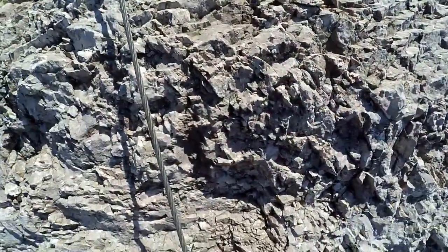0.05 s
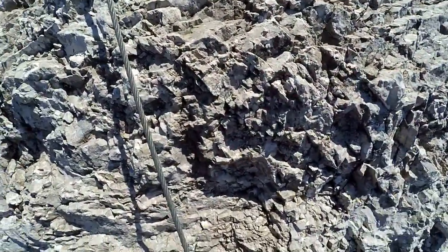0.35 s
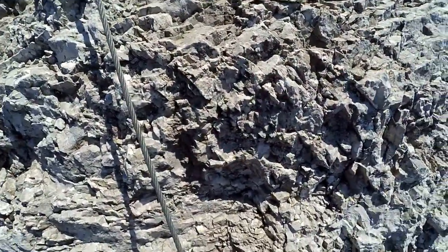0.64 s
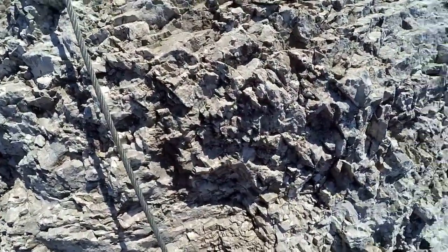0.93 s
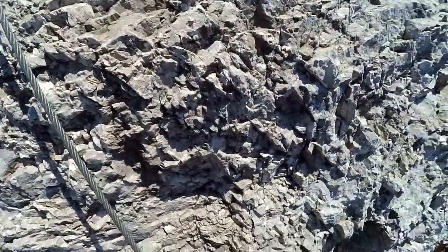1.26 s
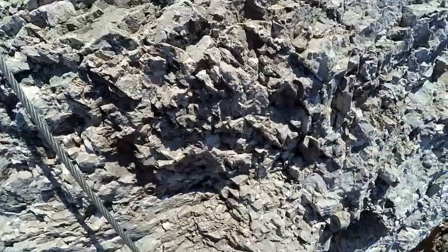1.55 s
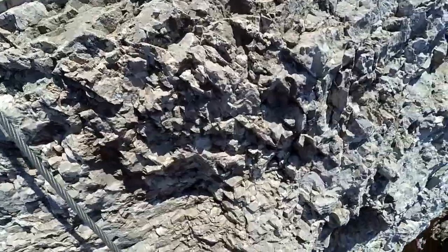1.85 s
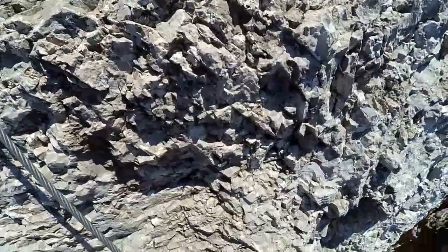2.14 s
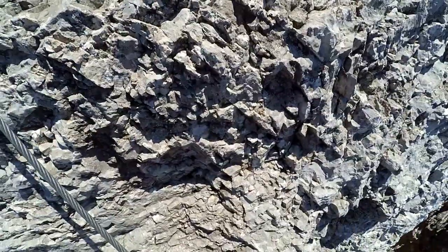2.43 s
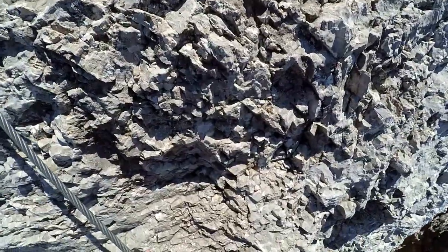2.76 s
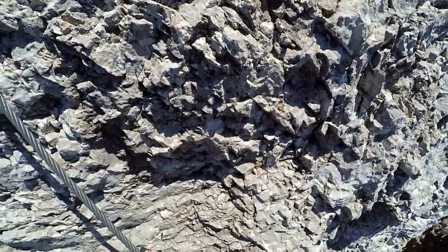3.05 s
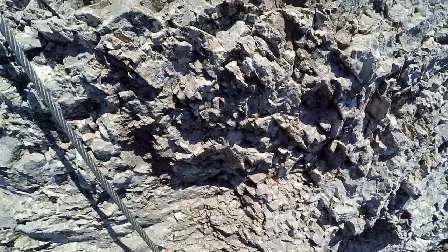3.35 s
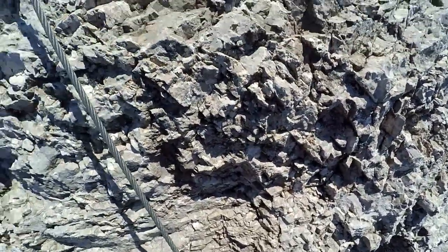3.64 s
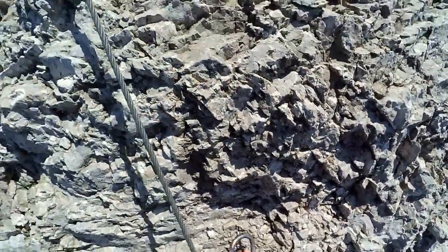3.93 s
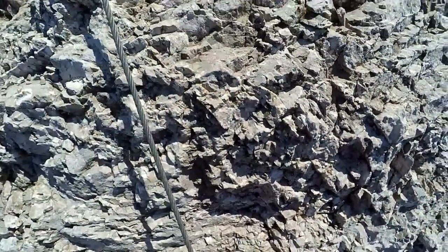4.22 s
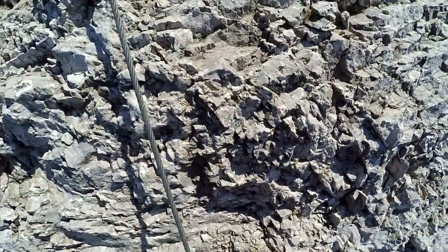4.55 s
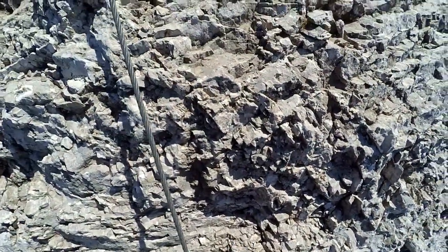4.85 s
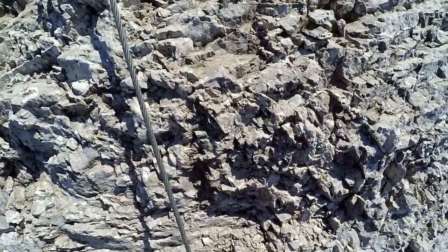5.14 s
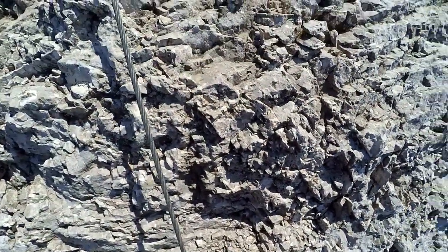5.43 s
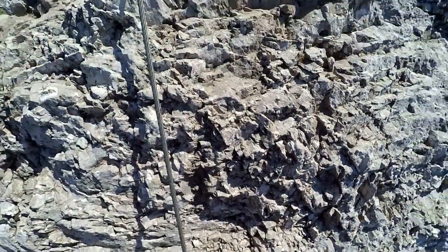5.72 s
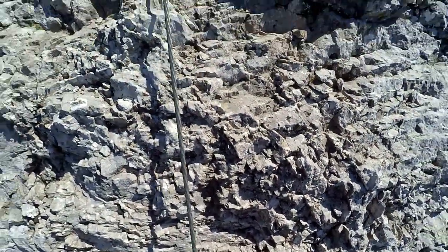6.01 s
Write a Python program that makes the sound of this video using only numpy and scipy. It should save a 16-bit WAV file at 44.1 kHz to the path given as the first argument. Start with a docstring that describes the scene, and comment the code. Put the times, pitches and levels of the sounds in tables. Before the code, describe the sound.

Wind buffets a body-worn microphone in uneven low thumps for the first two seconds, then falls to a faint rumble over quiet mountain air. Throughout, a climber's gear and boots make close, dry, irregular ticks on rock, with faint clothing rustle. At about 1.3 seconds a carabiner knocks sharply on a steel cable and rings briefly. A cluster of clicks follows, with lighter metal knocks around 1.6 and 2.3 seconds. Soles scrape briefly on grit, snapping small stones, most clearly between 3.2 and 3.6 seconds. After a small clack at 4 seconds, the loudest carabiner knock lands at about 4.4 seconds, with a thin high ring and a soft low bump. Two more knocks come near 5 and 5.5 seconds among further taps. A nylon sleeve swishes softly around 5.8 seconds, and a last light scuff and ticks follow just after 6 seconds.

```python
"""Carabiners knock as a climber moves up a rock face along a steel cable, heard from a body-worn camera.
Each impact is a broadband crack followed by the free vibration of quickly damped metal modes.
Small gear and boots tick on the rock; friction makes soles scrape on grit and a sleeve swish.
Turbulent wind buffets the microphone for the first two seconds, then drops to a low rumble.
One low bump on the camera comes with the loudest knock."""
import sys
import numpy as np
from scipy import signal
from scipy.fft import rfft, irfft, next_fast_len
from scipy.io import wavfile
from scipy.ndimage import uniform_filter1d

SR = 44100
rng = np.random.default_rng(int(sys.argv[2]) if len(sys.argv) > 2 else 0)


def inscribe(sig):
    """Save sig as 16-bit PCM at rate SR to the path in sys.argv[1].

    A 1-D sig is mono; a 2-D sig holds one channel per row.
    Samples are clipped to [-1, 1] before scaling.
    """
    pcm = np.round(np.clip(np.atleast_2d(sig).T, -1, 1) * 32767)
    wavfile.write(sys.argv[1], SR, pcm.astype(np.int16))


N = 276948
TIME = np.arange(N) / SR
ANTIPHASE = np.array([[1], [-1]])  # adds to the left channel, subtracts from the right


def undb(db):
    """Amplitude ratio of a level in decibels."""
    return 10 ** (np.asarray(db) / 20)


def unit(x):
    """Normalisation to an rms of 1."""
    return x / np.sqrt(np.mean(x ** 2) + 1e-18)


def curve(points):
    """Gain envelope interpolated in decibels between (time_s, level_db) points."""
    times, levels = np.transpose(points)
    return undb(np.interp(TIME, times, levels))


def add(track, start_s, sound):
    """Superposition of a sound onto a track."""
    i = max(int(start_s * SR), 0)
    track[i:i + len(sound)] += sound[:max(N - i, 0)]


def colour(x, spectrum, low_db=0, top_db=0, peak_hz=0, peak_db=0):
    """Minimum-phase filter of unit power gain: a spectrum, two shelves and one resonance."""
    low_hz, top_hz, half_width_hz = 1630, 10600, 200
    size = 2 * next_fast_len(len(x) // 2 + 1024, True)
    freq = np.fft.rfftfreq(size, 1 / SR)
    octave = np.log2(np.maximum(freq, 1))
    hz, db = np.transpose(spectrum)
    db = np.interp(octave, np.log2(hz), db)
    db += low_db * np.clip(1 + (np.log2(low_hz) - octave) / 1.5, 0, 1)
    db += top_db * np.clip(1 + (octave - np.log2(top_hz)) / 0.79, 0, 1)
    db += peak_db / (1 + ((freq - peak_hz) / half_width_hz) ** 2)
    cepstrum = irfft(np.log(unit(undb(db))))
    cepstrum[1:size // 2] *= 2  # folding the cepstrum makes the filter causal
    cepstrum[size // 2 + 1:] = 0
    return irfft(rfft(x, size) * np.exp(rfft(cepstrum)))[:len(x)]


def noise(spectrum):
    """Spectrally shaped Gaussian noise of rms 1."""
    return unit(colour(rng.standard_normal(N), spectrum))


def wander(rate_hz):
    """Random modulation: straight ramps between Gaussian values."""
    hold = int(SR / rate_hz)
    steps = np.repeat(rng.standard_normal(N // hold + 1), hold)
    return 1.6 * uniform_filter1d(steps, hold)[:N]


def steady(x, span_s):
    """Division by the running rms, which flattens the envelope of a noise."""
    power = x ** 2
    for _ in range(2):
        power = uniform_filter1d(power, max(int(span_s * SR), 2))
    return x / np.sqrt(np.abs(power) + 1e-9)


def fade(t, t60_s):
    """Exponential decay, 60 dB down at t60_s."""
    return np.exp(-np.log(1000) * t / t60_s)


def stroke(start_s, end_s, attack_s, t60_s):
    """Envelope of one movement: linear rise, hold, exponential decay."""
    return np.clip((TIME - start_s) / attack_s, 0, 1) * fade(np.maximum(TIME - end_s, 0), t60_s)


def swell(centre_s, length_s):
    """Gaussian envelope: a bell-shaped rise and fall."""
    return np.exp(-2 * np.minimum(((TIME - centre_s) / length_s) ** 2, 20))


# Spectrum of the open air: frequency_hz, density_db
AIR_SPECTRUM = [(60, 12), (150, -3), (300, -1.5), (500, -7), (900, -16.5), (1400, -25), (1850, -31.5),
                (2500, -27.5), (3600, -35), (6000, -41), (12000, -41), (15000, -56)]

def air(level_db, side_db):
    """Ambient noise of the mountainside, partly correlated between the two channels."""
    mid = noise(AIR_SPECTRUM) * undb(0.6 * wander(1.7))
    side = undb(side_db) * noise(AIR_SPECTRUM)
    return undb(level_db) * (mid + side * ANTIPHASE)


# Strength of the breeze between gusts: time_s, level_db
BREEZE_LEVELS = [(0, -14.5), (.45, -35), (.8, -21), (1.25, -24), (1.7, -27.5), (2.05, -27), (2.3, -40.5),
                 (3.27, -41), (3.55, -36), (4.0, -35.5), (4.15, -48.5), (5.0, -48), (6.28, -46.5)]
# Wind gusts, plus one low bump on the camera at the loudest knock (4.447 s):
# centre_s, length_s, push_db, buffet_db
GUSTS_AND_BUMP = [(0.023, 0.036, -44, -26), (0.106, 0.02, -38, -25), (0.214, 0.014, -22, -23),
                  (0.275, .03, -29.5, -20.5), (0.38, 0.034, -18.5, -24), (0.522, 0.026, -20.5, -22),
                  (0.602, 0.033, -27.5, -24), (.665, 0.056, -23.5, -26), (.72, 0.016, -23, -17),
                  (.758, 0.013, -16, -18), (.86, 0.033, -18.5, -30), (0.932, 0.018, -14, -16.5),
                  (0.966, 0.014, -17, -15.5), (.995, 0.032, -35, -27.5), (1.063, 0.018, -12.5, -12.5),
                  (1.086, 0.013, -29, -24), (1.129, 0.022, -33, -21), (1.197, 0.02, -25, -20),
                  (1.218, .012, -18, -20), (1.255, 0.024, -37, -28), (1.337, 0.017, -23, -20.5),
                  (1.432, 0.038, -22.5, -26), (1.514, 0.027, -19.5, -29.5), (1.566, 0.024, -41, -20.5),
                  (1.748, 0.016, -19, -18.5), (1.868, 0.017, -10, -13.5), (1.904, 0.017, -20, -11),
                  (1.929, 0.014, -20, -15.5), (1.961, 0.014, -18, -26), (2.037, 0.045, -28, -28.5),
                  (2.133, 0.032, -24, -38.5), (2.587, .035, -26, -40), (2.839, 0.015, -30.5, -43),
                  (3.362, 0.031, -36, -69), (3.548, 0.045, -34.5, -60.5), (3.694, 0.017, -44, -46),
                  (3.804, 0.027, -38, -56), (4.064, 0.032, -41, -45.5), (4.447, 0.019, -35, -54)]

def pressure_envelopes():
    """Three time scales: each gust, and the bump, adds a slow push, a shorter flutter and a thump."""
    rumble = curve(BREEZE_LEVELS)
    flutter = np.hypot(undb(-22) * rumble, undb(-56))  # some flutter persists in a lull
    thump = np.zeros(N)
    linger_s, sharp_s = 0.018, 0.018
    for centre_s, length_s, push_db, buffet_db in GUSTS_AND_BUMP:
        rumble += undb(push_db) * swell(centre_s, length_s + linger_s)
        flutter += undb(buffet_db) * swell(centre_s, length_s)
        sharpness = (sharp_s / length_s) ** 2.5  # the eddy in a shorter gust thumps harder
        thump += undb(buffet_db) * sharpness * swell(centre_s, 0.52 * length_s)
    return rumble, flutter, thump


def vortices(rate_hz, spread_db):
    """Vortex shedding at the edge of the housing: an uneven train of pressure pulses of either sign."""
    gap, size, sign = rng.standard_normal((N // 20, 3)).T
    onsets = np.cumsum(np.exp(0.4 * gap) * SR / rate_hz).astype(int)
    heights = np.sign(sign) * undb(spread_db * size)
    pulses = np.zeros(N)
    pulses[onsets[onsets < N]] = heights[onsets < N]
    return unit(pulses)


# Spectra of the three kinds of pressure fluctuation: frequency_hz, density_db
RUMBLE_SPECTRUM = [(8, -16.5), (20, 10), (32, -5.5), (60, -5), (110, -17.5), (180, -31.5), (400, -53),
                   (1000, -96.5)]
FLUTTER_SPECTRUM = [(50, -26.5), (120, 4), (200, -2), (300, -8.5), (450, -20), (700, -34), (1200, -48.5),
                    (3000, -53), (8000, -85.5)]
THUMP_SPECTRUM = [(30, 0), (70, 6.5), (130, 0), (230, -4), (420, -9), (650, -18.5), (1000, -32.5),
                  (1600, -44), (3000, -55.5), (8000, -65.5)]

def wind_and_bump(rumble, flutter, thump):
    """Pressure fluctuations at the microphone port: slow swings, buffeting and single thumps."""
    swings = rumble * steady(noise(RUMBLE_SPECTRUM), span_s=0.071)
    buffeting = colour(flutter * vortices(rate_hz=400, spread_db=4.5), FLUTTER_SPECTRUM)
    thumps = colour(thump * vortices(rate_hz=650, spread_db=0.5), THUMP_SPECTRUM)
    return swings + undb(-3.5) * buffeting + undb(-4) * thumps


def friction(rate_hz, spread_db, t60_s):
    """Stick-slip friction: random slips of uneven size, each a decaying burst of noise."""
    slips = rng.random(N) < rate_hz / SR
    sizes = undb(spread_db * np.minimum(rng.exponential(size=N), 3))
    power = signal.lfilter([1], [1, -fade(2 / SR, t60_s)], slips * sizes ** 2)
    return unit(np.sqrt(power) * rng.standard_normal(N))


# Reaches and steps: start_s, end_s, relative_level_db
BODY_MOVES = [(0, 0.247, -72), (0.554, 1.101, -81), (1.2, 1.444, -74), (1.62, 1.684, -62),
              (1.81, 1.918, -65), (2.218, 2.414, -69.5), (2.66, 2.78, -76), (3.57, 3.649, -54),
              (3.783, 3.87, -62), (4.03, 4.36, -72.5), (4.527, 5.052, -69), (5.158, 5.574, -73),
              (6.107, 6.203, -65.5)]
# Spectrum of rubbing cloth: frequency_hz, density_db
RUSTLE_SPECTRUM = [(500, 2.5), (1800, 6.5), (2600, -2), (4000, -2.5), (7000, -3), (10000, -9.5),
                   (13000, -12), (16000, -21)]

def rustle(rest_db):
    """Friction between the fibres of harness and jacket, rising with each move."""
    fibres = friction(rate_hz=700, spread_db=2.5, t60_s=0.035)
    effort = sum(undb(db) * stroke(start, end, attack_s=0.033, t60_s=0.13)
                 for start, end, db in BODY_MOVES)
    return np.hypot(effort, undb(rest_db)) * unit(colour(fibres, RUSTLE_SPECTRUM))


# Envelope of the sleeve's swish: time_s, level_db
SLEEVE_LEVELS = [(5.63, -82.5), (5.69, -56), (5.78, -53), (5.84, -54.5), (5.91, -63), (5.97, -74)]
# Spectrum of sliding nylon: frequency_hz, density_db
SLEEVE_SPECTRUM = [(1000, -10), (2500, -14.5), (4000, -5.5), (6300, 1), (8500, -5), (11000, -5),
                   (14500, -9), (16000, -21)]

def sleeve():
    """Sliding friction of nylon: one smooth swell of high-frequency noise."""
    sliding = (TIME > SLEEVE_LEVELS[0][0]) & (TIME < SLEEVE_LEVELS[-1][0])
    return sliding * curve(SLEEVE_LEVELS) * noise(SLEEVE_SPECTRUM) * undb(0.44 * wander(49))


# Drags of a sole over grit: start_s, end_s, relative_drag_db, loudest_stone_db
SOLE_DRAGS = [(1.58, 1.766, -65, -48.5), (2.095, 2.27, -70, -70), (2.333, 2.43, -62, -50),
              (2.737, 2.812, -68.5, -58), (2.881, 3.015, -68, -59), (3.17, 3.307, -59, -42.5),
              (3.478, 3.544, -61.5, -45), (3.557, 3.639, -54.5, -36), (3.783, 3.892, -72, -47.5),
              (4.862, 4.897, -75, -45.5), (5.215, 5.288, -57.5, -41.5), (5.565, 5.61, -65, -63),
              (6.087, 6.148, -61, -46)]
# Spectrum of scraped grit: frequency_hz, density_db
SCRAPE_SPECTRUM = [(200, -5), (650, 5.5), (1000, -4), (1350, 9.5), (1900, 2.5), (3000, 3.5), (4600, -3.5),
                   (6300, -1.5), (9000, -18.5), (12000, -11), (15000, -23)]

def scrapes():
    """Stick-slip of a sole on grit, dying away as the boot comes to rest."""
    drag = sum(undb(db) * stroke(start, end, attack_s=0.035, t60_s=0.049)
               for start, end, db, _ in SOLE_DRAGS)
    slips = friction(rate_hz=450, spread_db=3, t60_s=0.014)
    return drag * steady(colour(slips, SCRAPE_SPECTRUM), span_s=0.0051)


def unit_onset(x):
    """Normalisation of a transient to an rms of 1 over its first 6 ms or so."""
    return x / np.sqrt(np.mean(x[:256] ** 2))


# Spectrum of a hard contact: frequency_hz, density_db
CRACK_SPECTRUM = [(200, -20), (600, -10), (1100, -7.5), (1700, -8), (2300, -4.5), (4200, -2.5), (5600, -2),
                  (7300, 0), (10000, -1.5), (12500, -7.5), (14500, -9), (16000, -22.5)]

def crack(low_db, top_db, peak_hz, peak_db=8.5, *, rise_s, t60_s, tail_db, tail_t60_s):
    """Impact transient: dense, heavily damped vibration, then scattering from the rock nearby."""
    t = np.arange(SR // 6) / SR
    attack = 1 - np.exp(-t / rise_s)
    decay = fade(t, t60_s) + undb(tail_db) * fade(t, tail_t60_s)
    burst = attack * decay * steady(rng.standard_normal(len(t)), span_s=0.00077)
    return unit_onset(colour(burst, CRACK_SPECTRUM, low_db, top_db, peak_hz, peak_db))


def patter(spans, rate_hz, range_db, middle_hz):
    """Random small impacts in each (start_s, end_s, loudest_db), resonating over two octaves."""
    out = np.zeros(N)
    jitter, size, pitch = rng.random((3, 1000))
    times = (np.arange(len(jitter)) + jitter) / rate_hz
    for start_s, end_s, loudest_db in spans:
        for k in np.flatnonzero((times > start_s) & (times < end_s)):
            snap = crack(low_db=3, top_db=-3, peak_hz=middle_hz * 2 ** (2 * pitch[k] - 1),
                         rise_s=0.00035, t60_s=0.02, tail_db=-22.5, tail_t60_s=0.095)
            add(out, times[k], undb(loudest_db - range_db * (1 - size[k])) * snap)
    return out


def buckles():
    """Light impacts of loose buckles while the body moves."""
    return patter(BODY_MOVES, rate_hz=24, range_db=16, middle_hz=4690)


def stones():
    """Impulsive snaps of stones breaking loose under a dragging sole."""
    spans = [(start, end, db) for start, end, _, db in SOLE_DRAGS]
    return patter(spans, rate_hz=72, range_db=10, middle_hz=2580)


# Taps on the rock: start_s, relative_level_db, low_shelf_db, top_shelf_db, resonance_hz
ROCK_TAPS = [(0.1704, -51, 5, -6, 2150), (0.2612, -48, 15, -22, 1930), (0.5173, -54, 13, -4, 2200),
             (0.5727, -43.5, 0, -9, 2600), (0.6514, -49.5, 5, 0, 5770), (1.0154, -40.5, 10, -2.5, 5020),
             (1.0487, -38.5, 5, -1, 1590), (1.1014, -41.5, 2, -4.5, 2180), (1.208, -38, 9, -1, 3270),
             (1.3563, -40.5, 7, -14, 5300), (1.496, -33.5, 3.5, 8, 6570), (1.532, -45.5, 6, -9, 2710),
             (1.5553, -38, -1, -9, 7460), (1.5794, -37, -3, -2, 1660), (1.598, -40, -2, -13, 5440),
             (1.6176, -34, 4, -4, 5640), (1.6393, -31, 1.5, 3.5, 4400), (1.6927, -39.5, 4, -8, 5270),
             (1.7037, -40, 1, -1, 5170), (1.8675, -31.5, -5.5, 1, 7060), (1.888, -41, 0, -7, 3960),
             (2.016, -42.5, 2, -6, 1640), (2.038, -37.5, -1, -2.5, 7850), (2.211, -46, 9.5, -11, 5250),
             (2.3396, -39, 9.5, 0, 4200), (2.3467, -32, -4, -6.5, 4240), (2.3844, -33.5, -1, -5, 2890),
             (2.4053, -32, 1.5, -4, 4050), (2.4454, -43.5, 3, -4, 2930), (2.6548, -48.5, 5, -12, 8100),
             (2.714, -40.5, 2, -6, 3640), (2.785, -39.5, -1, -10, 3800), (2.921, -40, -2, -9, 4330),
             (2.9639, -40, 12.5, -4, 1700), (3.1595, -41, 6, -6, 2130), (3.1702, -41.5, 4, -16, 1700),
             (3.2174, -36.5, 0, 1, 2220), (3.2874, -37, 0, -7, 3060), (3.4881, -34.5, 0, -0.5, 6850),
             (3.535, -33, 0, -7.5, 3065), (3.568, -37.5, -8, -4, 9900), (3.6223, -38.5, -3, 9, 1500),
             (3.6743, -41.5, 3, -4, 1470), (3.721, -51, 6, 4, 1410), (3.77, -45.5, 7, 5, 1360),
             (3.822, -44, 8, 3, 1460), (4.1407, -52.5, 5, 0, 6430), (4.1813, -51.5, -18, 5, 7130),
             (4.2313, -43, 5.5, -3.5, 6440), (4.272, -52.5, 6, -2, 1470), (4.422, -42, 7, 9.5, 6700),
             (4.3156, -55, 4, -3, 1410), (4.604, -45.5, -21, -1, 6840), (4.815, -44, -6, 2.5, 7950),
             (4.9012, -37.5, 2.5, 2, 8750), (4.989, -40.5, 4, -9, 6500), (5.0361, -36.5, -5, -3.5, 8050),
             (5.123, -53.5, 3, -11, 1720), (5.172, -48, -3, -7, 3480), (5.193, -42.5, 0, -3, 7160),
             (5.2168, -37, 8.5, -2, 4430), (5.2583, -41, -1, -1, 1384), (5.3119, -38, 0, -2, 5140),
             (5.343, -45, 2, -18, 3060), (5.3656, -32.5, -0.5, -3, 4170), (5.5686, -31, 10.5, -2, 1580),
             (5.604, -43.5, 11, 2, 3640), (6.053, -53.5, 14, 5, 3860), (6.1291, -45.5, 20, 12, 3600),
             (6.179, -48, 11, 0, 2970)]

def ticks():
    """Damped impacts of gear and boots on rock, each with one contact resonance."""
    out = np.zeros(N)
    for start_s, level_db, *tone in ROCK_TAPS:
        tap = crack(*tone, rise_s=0.0005, t60_s=0.023, tail_db=-19.5, tail_t60_s=0.098)
        add(out, start_s, undb(level_db) * tap)
    return out


# Metal parts that ring on after a knock: start_s, pitch_hz, level_db, t60_s
AFTER_RINGS = [(1.342, 5285, -74, 0.58), (1.342, 10640, -64, 0.21), (1.642, 5420, -52, 0.38),
               (2.119, 6300, -53, .15), (4.432, 8680, -54, 0.33), (5.037, 3450, -45, 0.066),
               (5.464, 14000, -63, 0.26), (5.466, 11660, -65, .25)]

def pings():
    """Free vibration of loose metal, modulated in level and phase as the parts swing and touch."""
    out, t = np.zeros(N), np.arange(SR) / SR
    for start_s, pitch_hz, level_db, t60_s in AFTER_RINGS:
        flicker_db = 3 * wander(160)[:SR]
        drift_rad = 2 * wander(260)[:SR]
        tone = np.sin(2 * np.pi * pitch_hz * t + drift_rad)
        add(out, start_s, undb(level_db + flicker_db) * fade(t, t60_s) * tone)
    return out


# Normal modes of a carabiner: frequency_hz, relative_level_db, t60_s
CARABINER_MODES = [(690, -15, 0.0053), (1668, -3.5, 0.019), (2880, -35.5, .07), (3590, -18.5, 0.061),
                   (4280, -33, .03), (4950, -29, 0.13), (7020, 6.5, 0.018), (7290, 15.5, 0.0065),
                   (8700, -20, .04), (9600, -4.5, 0.013), (11900, -16, .035), (10800, -9, 0.014),
                   (13100, -8, 0.018)]

def carabiner_ring(t, top_db):
    """Modal vibration: a sum of decaying sinusoids, damped fast by hand and sling."""
    ring = np.zeros(len(t))
    for hz, mode_db, t60_s in CARABINER_MODES:
        detune, phase = rng.standard_normal(2)
        hardness_db = top_db * np.clip(np.log2(hz / 7000), -0.5, 1)  # hard contact favours high modes
        mode = np.sin(2 * np.pi * (hz * (1 + 0.0034 * detune) * t + phase))
        ring += undb(mode_db + hardness_db) * fade(t, t60_s) * mode
    attack = 1 - np.exp(-t / 0.0013)
    return unit_onset(ring * attack)


# Carabiner knocks: start_s, relative_level_db, low_shelf_db, top_shelf_db,
# resonance_hz, resonance_db, ring_to_crack_db
CARABINER_KNOCKS = [(1.3408, -15.3, -4, 2, 10580, 14, -3), (1.604, -26.5, -5, -2, 5500, 5, -11),
                    (2.1189, -42, -1, -17, 6300, 10, -17), (2.2538, -36.5, -11, -7, 8830, 9, -10),
                    (2.2908, -25.5, -8, -2, 10150, 10, -10), (3.9859, -30.5, -7, 3, 6900, 6, -9),
                    (4.4319, -12.8, -5, 2, 6850, 11, -3), (4.9693, -21.5, -4, -1, 4330, 4, -12),
                    (5.4643, -22, -11, 1, 4950, 11, -13)]

def carabiners():
    """Impact excitation: each knock divides its energy between a crack and the ringing modes."""
    out = np.zeros(N)
    for start_s, level_db, low_db, top_db, peak_hz, peak_db, ring_db in CARABINER_KNOCKS:
        hit = crack(low_db, top_db, peak_hz, peak_db,
                    rise_s=0.00044, t60_s=0.019, tail_db=-35, tail_t60_s=0.15)
        ring = carabiner_ring(TIME[:len(hit)], top_db)
        knock = (hit + undb(ring_db) * ring) / np.hypot(1, undb(ring_db))
        add(out, start_s, undb(level_db) * knock)
        # a faint copy of the hit leads each knock by 3.4 ms
        lead_db = level_db - 21 + min(ring_db, 0)
        add(out, start_s - 0.0034, undb(lead_db) * hit)
    return out


def scene():
    """Superposition: the climber sits in the centre; the wind differs slightly between the two ports."""
    metal = undb(-2.56) * carabiners() + pings()
    contacts = undb(-0.52) * ticks() + stones() + undb(16.5) * buckles()
    rubbing = undb(9) * scrapes() + undb(5.5) * rustle(rest_db=-73.5) + sleeve()
    envelopes = pressure_envelopes()
    pressure = wind_and_bump(*envelopes) + undb(-29) * wind_and_bump(*envelopes) * ANTIPHASE
    return metal + contacts + rubbing + pressure + air(level_db=-54, side_db=-7.5)


def record(dry):
    """Band limiting: the camera cuts the top and adds a small constant offset."""
    cutoff_hz, dc_offset = 15300, 0.052
    lowpass = signal.ellip(8, 0.2, 70, cutoff_hz, fs=SR, output="sos")
    return signal.sosfilt(lowpass, dry) + dc_offset


dry = scene()
out = record(dry)
inscribe(out)
```